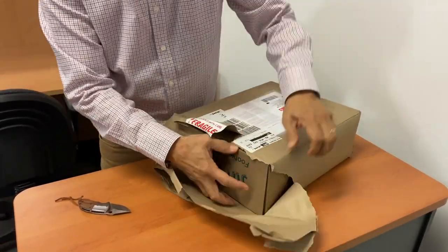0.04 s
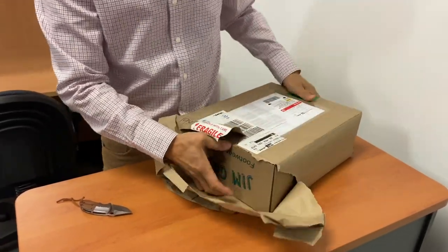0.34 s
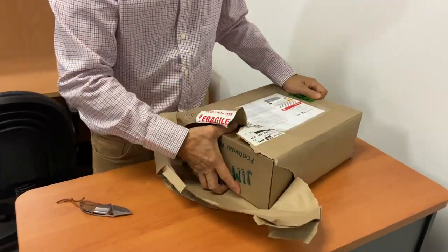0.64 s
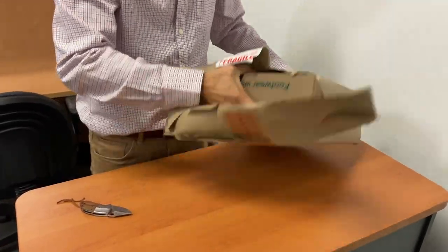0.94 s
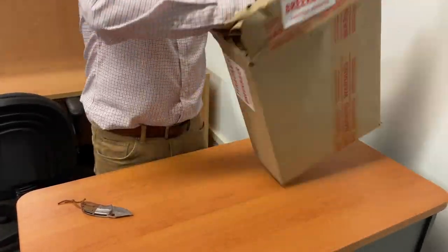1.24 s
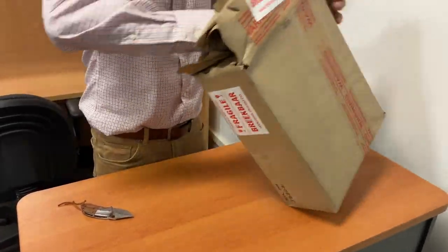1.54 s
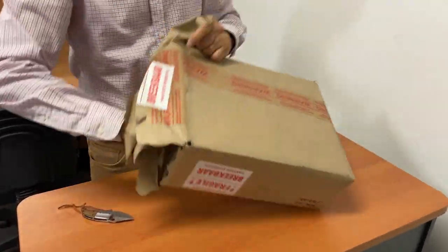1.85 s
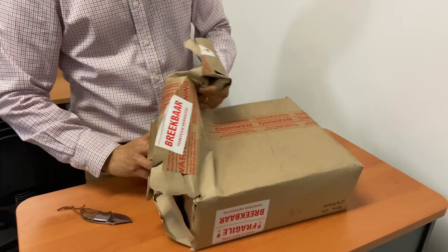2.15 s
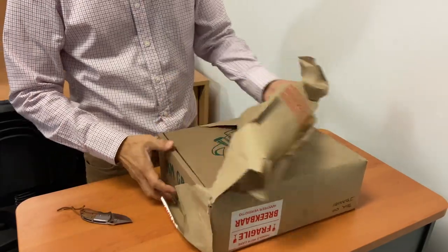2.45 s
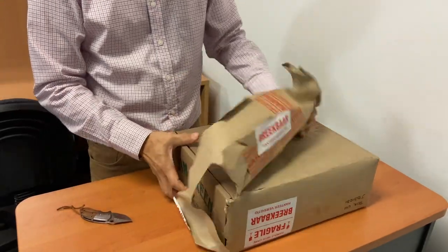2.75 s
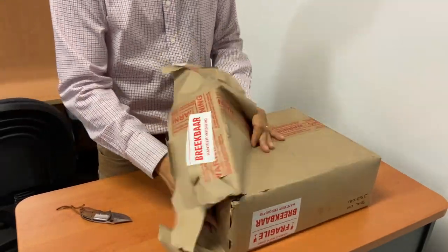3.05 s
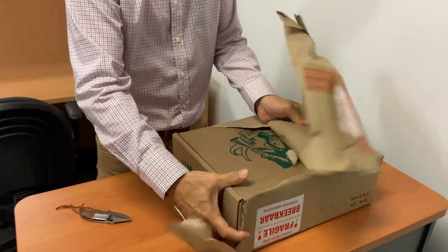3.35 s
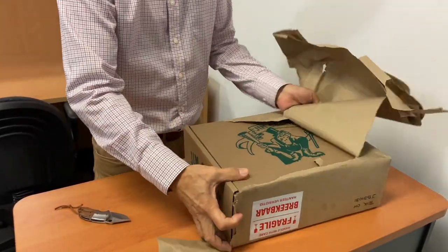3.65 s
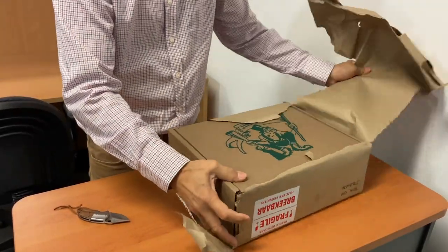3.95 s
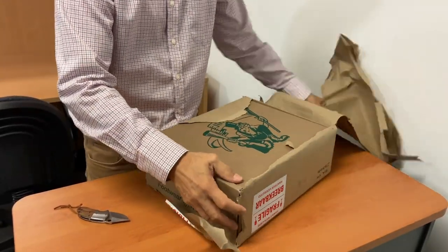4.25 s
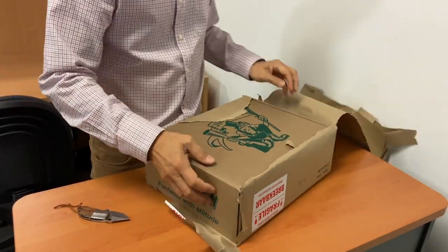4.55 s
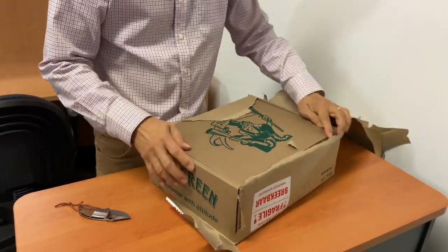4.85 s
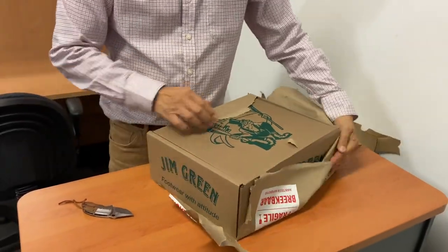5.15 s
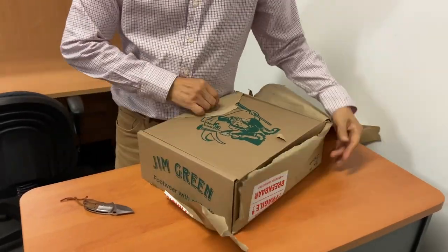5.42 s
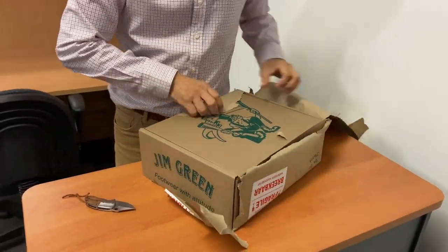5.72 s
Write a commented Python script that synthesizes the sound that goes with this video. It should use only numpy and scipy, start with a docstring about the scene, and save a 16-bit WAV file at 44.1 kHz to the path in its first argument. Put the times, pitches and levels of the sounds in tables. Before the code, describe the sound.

In a small, quiet room, a cardboard box is unwrapped close to the microphone, toward the left. Scattered paper crackles and a soft flap come first, then a firm bump on the table. Repeated tugs follow, with loud crinkling, brief hissing tears and hollow drumming from the box. After one more pull, the sound thins to light rustles, taps and swishes of hands on cardboard.

```python
"""Brown wrapping paper, pulled and torn off a cardboard box on a table in a small room.
Creases buckle in clicks, fibres part in a bright fizz, and the sheet and the box drum along.
Hands lift, knock and slide over the box and set it down; the table thuds, above a quiet room tone.
Heard close up on a pair of microphone ports, with the box off to the left."""
import sys
import numpy as np
from scipy import signal
from scipy.fft import rfft, irfft, next_fast_len
from scipy.io import wavfile
from scipy.ndimage import uniform_filter1d

SR = 44100
rng = np.random.default_rng(int(sys.argv[2]) if len(sys.argv) > 2 else 0)


def bounce(signal):
    """Save signal as a 16-bit WAV file at the path given by the first command-line argument."""
    frames = np.transpose(np.atleast_2d(signal))
    limited = np.clip(frames, -1, 1)
    pcm = np.round(limited * 32767).astype(np.int16)
    wavfile.write(sys.argv[1], SR, pcm)


N = 259295
T = np.arange(N) / SR

# creases that snap over: t/s, relative level/dB, centre f/Hz, top-end crispness/dB
CREASE_SNAPS = [(.078, -29, 2176, -20), (0.2142, -20.5, 3040, 3), (0.5213, -18, 1400, 5.5),
                (0.5449, -13, 2110, -1.5), (.5513, -23, 2310, -5), (0.968, -21, 1400, 6.5),
                (1.0808, -27.5, 3750, -4), (1.0964, -25, 3500, -8.5), (1.4935, -27, 3140, 10),
                (1.6748, -20, 2210, -5), (1.7447, -16.5, 2970, 2.5), (1.888, -14, 5360, 6),
                (1.954, -8, 1400, 1), (2.034, -19, 7170, 1), (2.172, -9, 2060, 5.5),
                (2.2361, -3.5, 4120, 3), (2.385, -16, 2770, 12.5), (2.5027, -14, 1890, -0.5),
                (2.6261, -21, 2160, -1.5), (2.6743, -16.5, 1700, 2.5), (2.725, -25, 1800, -1),
                (3.0998, -14, 1870, -3), (3.189, -23, 2190, -1), (3.24, -18, 3900, 6.5),
                (3.3543, -12, 4000, -7.5), (3.3926, -10.5, 2900, -2), (3.501, -8.5, 5870, -3),
                (3.667, -6.5, 3890, 2), (3.7983, -4, 2500, -8.5), (3.9519, -9, 3790, -18),
                (4.081, -5.5, 2120, 7), (4.1461, -3.5, 2050, 2), (4.1527, -5, 2070, 3),
                (4.352, -40.5, 9140, 12), (4.367, -24.5, 1720, -21), (4.522, -21.5, 3090, -8.5),
                (4.849, -20.5, 2476, 16), (4.92, -16.5, 2530, -4.5), (4.9612, -19, 4270, -6),
                (5.0522, -7, 2320, -8.5), (5.0644, -17, 2030, -8.5), (5.0871, -6, 3000, 2),
                (5.2664, -9.5, 2140, 12.5), (5.442, -34.5, 2600, -20)]
# short runs of a tear: t/s, relative level/dB, length/s
TEAR_RUNS = [(0.224, -15, 0.019), (1.4854, -32, 0.16), (2.233, -1.5, 0.062), (2.446, -22.5, 0.022),
             (3.3393, -8, 0.048), (3.494, -14, 0.048), (3.662, -8.5, 0.083), (3.788, -7, 0.061),
             (3.833, -20, 0.026), (5.2226, -20.5, 0.028), (5.265, -14, 0.04)]
# spectrum of cracking paper: f/Hz, level/dB
CRACK_SPECTRUM = [(150, -25.5), (500, 12.5), (900, 14), (2000, -1.5), (4000, 10.5), (7000, 2), (10000, 1),
                  (16000, -37)]


def amp(db):
    """Decibels to gain."""
    return 10 ** (np.asarray(db) / 20)


def unit(x):
    """Scales to rms 1."""
    return x / np.sqrt(np.mean(x ** 2) + 1e-20)


def read(points, hz):
    """Reads a table on a log-frequency axis."""
    f, value = np.transpose(points)
    return np.interp(np.log(hz + 1), np.log(np.sort(f) + 1), value)


def add(mix, s, sound):
    """Adds a sound at time s."""
    part = mix[max(round(s * SR), 0):][:len(sound)]
    part += sound[:len(part)]


def colour(x, spectrum, hz=1000, slope_db=0, size=2048):
    """Causal filter: a spectrum, falling away by slope_db an octave on both sides of hz."""
    f = abs(np.fft.fftfreq(size, 1 / SR))
    octaves_off = np.hypot(np.log2((f + 1) / hz), .5)
    log_gain = np.log(amp(read(spectrum, f) - slope_db * octaves_off))
    taps = np.fft.ifft(np.exp(np.conj(signal.hilbert(log_gain)))).real  # minimum phase
    return signal.oaconvolve(x, taps)[:len(x)]


def steady(x, size=900):
    """Takes out slow swells and holds the rms near 1."""
    power = uniform_filter1d(uniform_filter1d(x ** 2, size), size)
    return x / np.sqrt(abs(power) + 1e-12)


def grains(per_s, spread_db, lo_hz, hi_hz, cycles, clump_db, facets=22):
    """Clicks of unequal size come in avalanches that start at once and die away; each rings one facet."""
    fires = rng.random(N) < per_s / SR
    size = np.minimum(rng.exponential(1, N), 4)
    facet = rng.integers(0, facets, N)
    onsets = 1. * (rng.random(N) < 170 / SR)  # 170 avalanches a second
    avalanches = signal.lfilter([1], [1, -np.exp(-1 / (0.0022 * SR))], onsets)
    clumps = np.minimum(unit(avalanches - avalanches.mean()), 2.5)
    clicks = fires * amp(spread_db * size + clump_db * clumps) * rng.choice([-1, 1], N)
    t, out = T[:1500], np.zeros(N)
    for k, hz in enumerate(np.geomspace(lo_hz, hi_hz, facets)):
        ring = np.exp(-t * hz / cycles) * np.cos(2 * np.pi * hz * t)
        out += signal.oaconvolve(clicks * (facet == k), unit(ring) * np.sqrt(hz))[:N]
    return unit(out)


def room_tone():
    """The quiet air of the room: a low, even rumble with a trace of hiss."""
    # spectrum of the air: f/Hz, level/dB
    spectrum = [(20, -6), (50, 10.5), (78, -1.5), (120, 10.5), (200, -1), (400, -7), (1000, -24.5),
                (4000, -22), (16000, -54.5)]
    return amp(-55) * unit(colour(rng.standard_normal(N), spectrum))


def room(x, wet_db=-15, echoes_per_s=2500):
    """Sparse reflections from the table and the near walls, each band dying at its own speed."""
    # decay of the room: f/Hz, t60/s
    decay = [(100, 0.48), (400, 0.12), (1500, 0.19), (5000, 0.056), (15000, 0.073)]
    t = T[:SR // 2]
    echoes = rng.standard_normal(len(t)) * (rng.random(len(t)) < echoes_per_s / SR) * (t > .004)
    hz, frame_s, bands = signal.stft(echoes, SR, nperseg=256)
    fade = amp(-60 * frame_s / read(decay, hz)[:, None])
    tail = signal.istft(bands * fade, SR, nperseg=256)[1]
    return x + amp(wet_db) * signal.oaconvolve(x, tail / np.linalg.norm(tail))[:N]


def scatter(x, size=256):
    """The same sound by way of many short paths: its envelope stays, its phase is lost."""
    frames = dict(nperseg=size, noverlap=size * 3 // 4)
    bands = signal.stft(x, SR, **frames)[2]
    paths = rng.standard_normal(bands.shape) + 1j * rng.standard_normal(bands.shape)
    paths = uniform_filter1d(uniform_filter1d(paths, size=8, axis=1), size=5, axis=0)
    scattered = signal.istft(bands * paths / abs(paths), SR, **frames)[1][:N]
    return unit(scattered) * np.std(x)


def microphone_ports(left):
    """The right port lies in shade: it hears a shifted copy of the left mixed with scattered sound."""
    # shading of the right port: f/Hz, loss/dB
    shade = [(60, 11), (300, 11), (600, 10), (1100, 14.5), (2200, 9), (3500, 15), (4700, 8.5), (6500, 5),
             (8300, 7.5), (9200, 1.5), (16000, -1.5)]
    # likeness of the two ports: f/Hz, coherence/0-1
    likeness = [(60, .9), (400, .9), (1100, .76), (2000, .5), (3200, .3), (6000, .35), (7500, .75),
                (9000, .98), (11000, .99), (16000, .99)]
    # right port behind left: f/Hz, phase lag/rad
    lag = [(60, -3.4), (400, -1.4), (1600, -1.2), (2800, 1.8), (4200, -1), (5500, -3), (6600, -5.5),
           (7400, -6.6), (8500, -9.2), (9400, -9.6), (10400, -12.5), (11900, -12.7), (12900, -15.6),
           (13800, -15.9), (14600, -18.85)]
    size = next_fast_len(N + SR // 2)
    hz = np.fft.rfftfreq(size, 1 / SR)
    coherence = read(likeness, hz)
    direct = coherence * np.exp(-1j * read(lag, hz)) * rfft(left, size)
    diffuse = np.sqrt(1 - coherence ** 2) * rfft(scatter(left), size)
    right = irfft((direct + diffuse) * amp(-read(shade, hz)), size)[:N]
    return np.array([left, right])


def flap(top_s=1.08, top_db=-25.5, fade_db_per_s=132):
    """The loose side of the wrapping flaps as the box is swung up, most at the height of the swing."""
    # spectrum of the flapping: f/Hz, level/dB
    spectrum = [(30, -20), (60, 2.5), (100, 16.5), (160, 3), (260, -2.5), (600, -62.5)]
    flutter = steady(colour(rng.standard_normal(N), spectrum))
    return flutter * amp(top_db - fade_db_per_s * abs(T - top_s))


def slides(slope_db=24, grain_db=4, gain_db=1.5):
    """A fold or a palm sticks and slips on the cardboard: a grainy swish through one narrow resonance."""
    # slides: middle t/s, relative level/dB, length/s, resonance f/Hz
    strokes = [(0.641, -38.5, 0.043, 5000), (0.636, -49.5, .04, 1900), (0.797, -38, 0.038, 4350),
               (0.916, -43.5, 0.11, 3550), (0.967, -36, .08, 3130), (0.971, -46.5, .08, 1640),
               (1.02, -34.5, .09, 786), (1.08, -43, 0.14, 3040), (1.246, -50, 0.15, 2300),
               (2.112, -30, 0.038, 750), (2.460, -25, 0.029, 4480), (3.382, -20.5, 0.088, 800),
               (4.124, -20.5, 0.037, 2134), (4.22, -28, 0.032, 2200), (4.599, -48, 0.052, 1640),
               (4.64, -45.5, 0.036, 5510), (5.091, -25.5, 0.04, 800), (5.236, -26, .04, 2340),
               (5.442, -33, 0.048, 2130), (5.621, -39.5, 0.11, 653), (5.732, -31, 0.13, 667)]
    out = np.zeros(N)
    for s, db, length, hz in strokes:
        noise, slips = rng.standard_normal((2, SR // 2))
        size = int(length * SR)
        rub = noise * amp(grain_db * unit(uniform_filter1d(slips, size=150)))
        swish = unit(colour(rub, CRACK_SPECTRUM, hz, slope_db)[:size])
        arch = np.sin(np.linspace(0, np.pi, size))
        add(out, s - length / 2, amp(db) * swish * arch)
    return out * amp(gain_db)


def knocks(slope_db=14, rattle_db=-5, rattle_s=0.015, gain_db=3):
    """A blow rings the modes of box and table near its own pitch, and the loose wrapping rattles."""
    # knocks on the box and low thuds of the table: t/s, relative peak/dB, centre f/Hz, factor on t60
    blows = [(0.242, -10, 185.5, 0.79), (0.249, -26.5, 90, 0.9), (0.262, -15.5, 222, 0.34),
             (0.292, -25, 260, 0.33), (.546, -17.5, 634, 0.21), (1.100, -24, 860, 0.41),
             (1.555, -24.5, 339, 0.89), (1.566, -37, 111, 0.68), (1.678, -16.5, 542, .7),
             (1.955, -14.5, 358, .7), (2.173, 1, 684, 1), (2.182, -3, 314, .8), (2.199, -14.5, 80, 1.1),
             (2.239, -8, 204, 2.1), (2.303, -17, 82.5, 1), (2.58, -28, 91, .9), (2.505, -16.5, 870, .6),
             (2.558, -24.5, 369, .8), (2.795, -33, 870, 1.9), (2.879, -39.5, 770, 1.4),
             (3.062, -19.5, 386, .5), (3.102, -16.5, 328, 0.67), (3.132, -15, 432, .7),
             (3.193, -20, 718, 1.6), (3.233, -21, 361, 0.4), (3.35, -11.5, 841, 0.7), (3.383, -16, 330, .6),
             (3.531, -11, 294, .6), (3.572, -11, 286, 0.84), (3.67, -16.5, 793, 0.74),
             (3.743, -12, 240, .6), (3.829, -10, 196.4, 1.2), (3.839, -16.5, 83, 1.1),
             (4.016, -12, 800, .7), (4.083, -10, 1100, .6), (4.11, -11, 259, 0.81), (4.163, -27.5, 90, 1),
             (4.256, -24.5, 767, 2), (4.313, -23.5, 269, 0.43), (4.36, -25, 875, 0.99),
             (4.526, -28.5, 787, 0.42), (4.535, -25.5, 890, 0.52), (4.688, -30.5, 880, 0.48),
             (4.713, -12.5, 307, .65), (4.73, -33.5, 105, 1.6), (4.752, -22, 747, 0.7),
             (4.922, -17, 360, 0.32), (4.964, -20, 840, 0.4), (5.064, -9.5, 838, 0.25),
             (5.3, -16, 298, 0.88), (5.309, -28, 78, 0.98), (5.36, -17.5, 392, 0.5),
             (5.371, -43, 70.7, 1.8), (5.52, -44, 71, 2.3), (5.573, -22.5, 357, 0.61),
             (5.611, -29, 725, 0.91), (5.694, -25.5, 540, 0.85), (5.802, -27, 353, 0.29)]
    # modes of the box and the table under it: f/Hz, level/dB, t60/s
    box_and_table_modes = [(78, 1.5, 0.13), (113, -6, 0.33), (178, -13, 0.15), (244, -5, 0.11),
                           (264.7, -5, 0.22), (318, -8, 0.099), (360, -0.5, 0.16), (415, 5.5, 0.027),
                           (460, -10, 0.12), (597, -13.5, 0.095), (674, 3.5, 0.061), (725, 0.5, 0.075),
                           (819, 5, 0.11), (897, 8, 0.058), (1116, -20, 0.32), (1400, -8.5, 0.13)]
    # spectrum of the rattling wrapping: f/Hz, level/dB
    rattle_spectrum = [(30, -31.5), (55, -17.5), (80, 0.5), (250, -10), (900, -6.5), (3000, -11.5),
                       (10000, -29.5)]
    out, t = np.zeros(N), T[:16000]
    hz, mode_db, t60 = np.array(box_and_table_modes).T[:, :, None]
    for s, db, centre_hz, ring in blows:
        weight = amp(mode_db - slope_db * abs(np.log2(hz / centre_hz))) * rng.choice([-1, 1], hz.shape)
        detune = rng.uniform(.975, 1.025, hz.shape)
        modes = weight * amp(-60 * t / (t60 * ring)) * np.cos(2 * np.pi * hz * detune * t)
        body = modes.sum(0) * (1 - np.exp(-t * centre_hz))  # soft, low blows build up more slowly
        burst = rng.standard_normal(len(t)) * np.exp(-t / rattle_s)
        rattle = colour(burst, rattle_spectrum, centre_hz, slope_db)
        blow = unit(body) + amp(rattle_db) * unit(rattle)
        add(out, s, amp(db) * blow / abs(blow).max())
    return out * amp(gain_db)


def hands(rise_db_per_s=1500, fall_db_per_s=439, sag_db_per_s=35.5, release_db_per_s=401):
    """Crinkle, fizz and drum levels in dB: pulls rise and fall, rustles swell, sag and are released."""
    # long pulls on the wrapping, one curve each: t/s, relative crinkle/dB, fizz/dB, drumming/dB
    pulls = [
        [(0.73, -53, -62, -56), (0.756, -52, -51.5, -94), (0.808, -46.5, -42.5, -44.5),
         (0.892, -52.5, -64, -62.5), (0.942, -36.5, -56, -60), (0.988, -50.5, -56, -38.5),
         (1.05, -49, -64.5, -50), (1.104, -55.5, -47, -39), (1.164, -52, -54, -42.5), (1.25, -51.5, -52.5, -58),
         (1.288, -51, -70, -60), (1.33, -62, -106, -67)],
        [(1.65, -65.5, -53, -69), (1.682, -41, -68.5, -37.5), (1.698, -30.5, -33.5, -33.5),
         (1.806, -29.5, -30.5, -26), (1.872, -34.5, -44.5, -36), (1.886, -32.5, -37.5, -31.5),
         (1.942, -34.5, -38.5, -38.5), (1.952, -30, -46, -23.5), (2.034, -29.5, -28, -27),
         (2.072, -41, -48.5, -31.5), (2.094, -38, -42.5, -50.5), (2.14, -44.5, -39, -32)],
        [(2.14, -38.5, -52, -47), (2.182, -18.5, -21, -14), (2.226, -29, -39.5, -14.5), (2.236, -30, -23, -29),
         (2.286, -23, -37.5, -24.5), (2.338, -40, -40.5, -27.5), (2.478, -33, -41.5, -41.5),
         (2.544, -17.5, -24.5, -26), (2.586, -25, -29.5, -22), (2.666, -40, -67.5, -43),
         (2.674, -24.5, -61, -53), (2.7, -50, -85, -58.5)],
        [(3.0, -59, -53, -69.5), (3.064, -31, -51.5, -35.5), (3.126, -49.5, -45.5, -29.5),
         (3.226, -40.5, -50, -42.5), (3.242, -25, -32.5, -28.5), (3.286, -31.5, -39, -27.5),
         (3.364, -22, -29, -20.5), (3.464, -26, -26.5, -21), (3.49, -27.5, -37.5, -35),
         (3.508, -28, -22.5, -23), (3.576, -25.5, -23, -26), (3.64, -31.5, -29, -35)],
        [(3.64, -37.5, -26, -40), (3.676, -25.5, -18, -24.5), (3.754, -24, -25, -26.5),
         (3.836, -15.5, -22.5, -19), (3.906, -29.5, -35, -25), (4.01, -23.5, -40.5, -32),
         (4.028, -26.5, -44.5, -22), (4.088, -15, -24, -44), (4.114, -29, -37.5, -18.5),
         (4.218, -31, -38.5, -34), (4.282, -48.5, -47.5, -77.5), (4.33, -51.5, -66.5, -38)],
        [(4.9, -52, -60.5, -56), (4.918, -39.5, -54.5, -41), (4.992, -32.5, -41, -28),
         (5.048, -29, -53.5, -36.5), (5.096, -28.5, -41, -32.5), (5.166, -45.5, -61.5, -51),
         (5.248, -28, -38.5, -47), (5.276, -24.5, -34.5, -33.5), (5.376, -39.5, -59, -35.5),
         (5.45, -46.5, -50.5, -34.5), (5.486, -49.5, -98, -35.5), (5.51, -77, -72, -73)],
    ]
    # rustles as the grip shifts: start t/s, swell/s, length/s, crinkle/dB, fizz/dB, drumming/dB
    rustles = [(0, 0.001, 0.004, -39, -57, -35.5), (0.136, 0.078, .07, -46.5, -45, -58),
               (0.205, 0.029, 0.054, -31, -34, -34), (0.359, 0.022, .07, -53.5, -58.5, -67),
               (0.43, .02, 0.028, -43.5, -44, -41), (0.508, 0.017, 0.05, -30, -42, -24),
               (.61, 0.03, 0.016, -30, -37.5, -66), (1.372, 0.026, 0.15, -67, -85, -53.5),
               (1.45, .008, .015, -67, -53, -66), (1.49, .016, 0.063, -31.5, -32.5, -39),
               (1.643, .01, .018, -60, -41, -67), (2.705, .02, 0.103, -45.5, -67, -69),
               (2.788, 0.05, 0.11, -51, -45, -59), (2.919, 0.028, 0.094, -67.5, -60, -62.5),
               (4.345, 0.0099, 0.031, -40, -45, -28.5), (4.536, .03, 0.06, -46, -60, -72),
               (4.596, .05, 0.12, -42.5, -41.5, -64), (4.742, 0.06, 0.16, -46, -46.5, -40),
               (5.518, 0.017, 0.03, -53.5, -46.5, -38.5), (5.553, .03, .07, -59.5, -62, -38),
               (5.681, 0.015, .075, -35.5, -50, -31), (5.777, 0.0084, 0.063, -51.5, -55, -38.5),
               (5.851, 0.018, .04, -33, -45, -31)]
    pull_gain_db = (4.5, 6, 4.5)  # gain of a pull's crinkle, fizz and drumming
    power = np.full((3, N), 1e-10)
    for pull in pulls:
        s, *levels = np.array(sorted(map(tuple, pull))).T
        ends_db = rise_db_per_s * np.maximum(s[0] - T, 0) + fall_db_per_s * np.maximum(T - s[-1], 0)
        for layer, db in enumerate(levels):
            power[layer] += amp(np.interp(T, s, db) + pull_gain_db[layer] - ends_db) ** 2
    for start, swell, length, *levels in rustles:
        t = np.maximum(T - start, 0)
        fade = amp(-sag_db_per_s * t - release_db_per_s * np.maximum(t - length, 0))
        power += np.outer(amp(levels), np.minimum(t / swell, 1) * fade) ** 2
    return 10 * np.log10(power)


def catching(dip_db=5, build_s=.012):
    """Before it snaps or rips, the sheet catches and falls quieter while the tension builds."""
    tension = np.zeros(N)
    for s, *_ in [*CREASE_SNAPS, *TEAR_RUNS]:
        time_left = s - T[:round(s * SR)][-4000:]
        add(tension, s - time_left[0], np.exp(-time_left / build_s))
    return amp(-dip_db * np.minimum(tension, 1))


def bend(x, depth_db, tilt_db=0, size=512):
    """As the sheet bends, its resonances come and go; tilt_db an octave shifts its brightness."""
    frames = dict(nperseg=size, noverlap=size * 3 // 4)
    hz, frame_s, bands = signal.stft(x, SR, **frames)
    patches = rng.standard_normal(bands.shape)
    patches = uniform_filter1d(uniform_filter1d(patches, size=14, axis=1), size=9, axis=1)
    patches = unit(uniform_filter1d(uniform_filter1d(patches, size=7, axis=0), size=4, axis=0))
    octaves = np.log2(np.clip(hz, 1200, 8000) / 3300)[:, None]
    tilt = np.interp(frame_s, T, np.broadcast_to(tilt_db, N))
    return signal.istft(bands * amp(depth_db * patches + octaves * tilt), SR, **frames)[1][:N]


def sheet(drum_db, rasp_db):
    """Each slip of the taut sheet drums on the box and sets the loose part ringing in a hollow rasp."""
    # spectrum of the drumming: f/Hz, level/dB
    drum_spectrum = [(30, -32.5), (55, -15.5), (78, -11.5), (120, -5), (165, -11.5), (215, -2.5),
                     (275, 2.5), (370, 5.5), (500, -10.5), (700, -5.5), (1500, -56.5)]
    # spectrum of the rasp: f/Hz, level/dB
    rasp_spectrum = [(250, -43.5), (450, -4), (600, -2.5), (760, 5), (900, -1), (1100, -2.5), (1500, -14),
                     (3000, -41.5)]
    thuds = grains(per_s=480, spread_db=4, lo_hz=68.1, hi_hz=676.5, cycles=1.98, clump_db=1)
    ticks = grains(per_s=600, spread_db=2, lo_hz=407, hi_hz=1746, cycles=4.8, clump_db=2.5)
    drum = steady(colour(thuds, drum_spectrum))
    rasp = steady(colour(ticks, rasp_spectrum))
    return drum * amp(drum_db) + rasp * amp(rasp_db)


def crinkle(level_db, tilt_db, rub_db=0.5):
    """Paper rubs on cardboard while small creases buckle; the folds ring in shifting resonances."""
    # spectrum of crinkling paper: f/Hz, level/dB
    spectrum = [(300, -22.5), (700, -0.5), (1200, -2), (2100, 3), (2700, -4), (3500, 2), (5200, -2.5),
                (7500, -13), (10000, -15.5), (16000, -33.5)]
    ticks = grains(per_s=2800, spread_db=1, lo_hz=736, hi_hz=10700, cycles=1.5, clump_db=3)
    paper = colour(ticks + amp(rub_db) * rng.standard_normal(N), spectrum)
    paper = bend(paper, depth_db=2, tilt_db=tilt_db)  # broad resonances
    paper = bend(paper, depth_db=2.5, size=2048)  # narrow ones
    return steady(paper) * amp(level_db)


def fizz(level_db):
    """Thousands of fibres part or scrape each second."""
    # spectrum of the fibres: f/Hz, level/dB
    spectrum = [(2000, -46), (5000, -4.5), (7500, -3.5), (9500, -3), (11500, -0.5), (13500, -3),
                (15800, -7)]
    fibres = grains(per_s=14000, spread_db=1.5, lo_hz=3500, hi_hz=16000, cycles=.8, clump_db=1.8)
    paper = bend(colour(fibres, spectrum), depth_db=4)
    return steady(paper) * amp(level_db)


def snaps(fade_s=0.052, rise_s=0.0015, shiver_db=-16, shiver_s=0.021, crisp_above_hz=6000, gain_db=17):
    """A crease flips: a crack of a few milliseconds rings three facets, then the sheet shivers."""
    out, t = np.zeros(N), T[:5000]
    noises = rng.standard_normal((len(CREASE_SNAPS), len(t)))
    facet_ratios = rng.uniform([1, .4, 1.3], [1, .65, 1.9], (len(CREASE_SNAPS), 3))
    rise = 1 - np.exp(-t / rise_s)
    fade = amp(-60 * t / fade_s)
    envelope = rise * (fade ** 2 + amp(shiver_db) * np.exp(-t / shiver_s))
    for (s, db, hz, crisp_db), noise, ratios in zip(CREASE_SNAPS, noises, facet_ratios):
        spectrum = [(f, level + crisp_db * (f > crisp_above_hz)) for f, level in CRACK_SPECTRUM]
        slope_db = 8.5 - 0.37 * crisp_db  # dull cracks are narrower
        crack = colour(noise * envelope, spectrum, hz, slope_db)
        ring = sum(weight * np.sin(2 * np.pi * f * t) for weight, f in zip([1, .7, .5], hz * ratios))
        snap = unit(crack) + unit(rise * fade ** 3.1 * ring)
        add(out, s, amp(db) * snap / np.linalg.norm(snap))
    return out * amp(gain_db)


def rips(spread_db=2, fall_s=.008, gain_db=-13):
    """The tear jumps ahead: a sudden volley of breaking fibres."""
    out, t = np.zeros(N), T[:8000]
    for s, db, length in TEAR_RUNS:
        noise = rng.standard_normal(len(t))
        roughness = amp(spread_db * np.repeat(rng.standard_normal(len(t)), 20)[:len(t)])
        volley = unit(colour(noise * roughness, CRACK_SPECTRUM))
        envelope = np.exp(-np.maximum(t - length, 0) / fall_s)
        add(out, s, amp(db) * volley * envelope)
    return out * amp(gain_db)


def scene():
    """Paper and box close by on the left, with the small room and its quiet air behind."""
    air = room_tone()
    crinkle_db, fizz_db, drum_db = hands()
    tilt_db = 0.67 + 0.17 * (fizz_db - crinkle_db)  # more fizz goes with a brighter crinkle
    rasp_db = crinkle_db + 0.74 * (drum_db - crinkle_db) - 3  # the rasp mostly follows the drumming
    handling = (crinkle(crinkle_db, tilt_db) + fizz(fizz_db) + sheet(drum_db, rasp_db)) * catching()
    unwrapping = handling + flap() + snaps() + rips() + knocks() + slides()
    return microphone_ports(room(unwrapping) + air)


def record(dry, rumble_hz=35, ceiling=.93, edge_hz=15850):
    """Deep rumble below about 35 Hz is kept out and the loudest peaks clip; then the band limit."""
    lean = signal.sosfilt(signal.butter(1, rumble_hz, "highpass", fs=SR, output="sos"), dry)
    clipped = np.clip(lean, -ceiling, ceiling)
    lowpass = signal.firwin(601, edge_hz, window=("kaiser", 7), fs=SR)
    return signal.oaconvolve(clipped, lowpass[None], "same", axes=1)


dry = scene()
out = record(dry)
bounce(out)
```